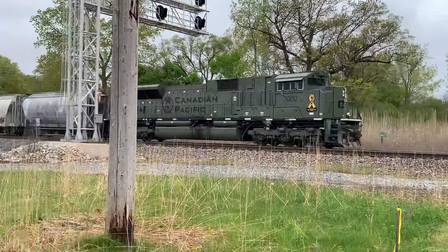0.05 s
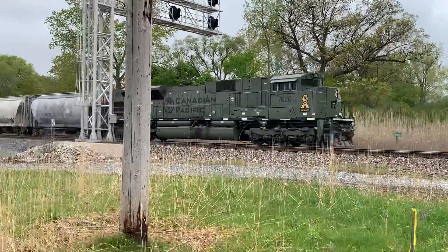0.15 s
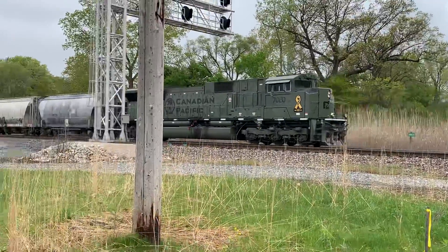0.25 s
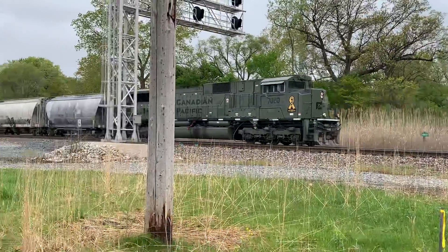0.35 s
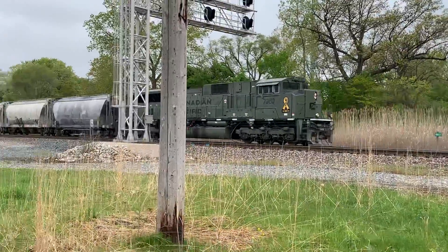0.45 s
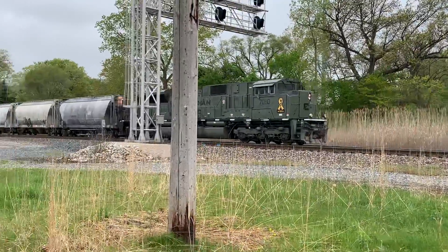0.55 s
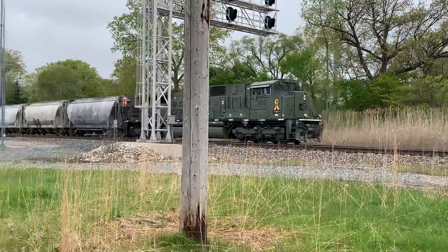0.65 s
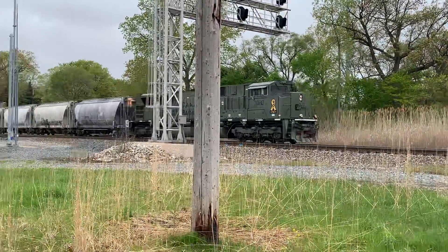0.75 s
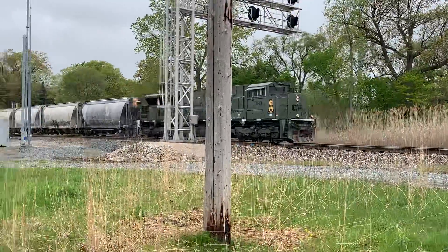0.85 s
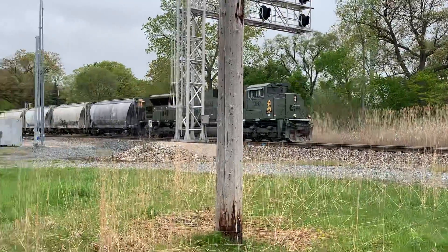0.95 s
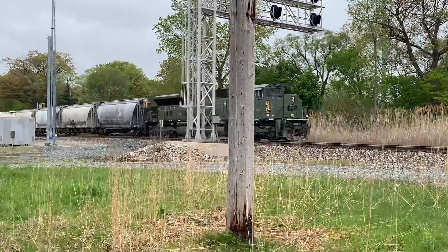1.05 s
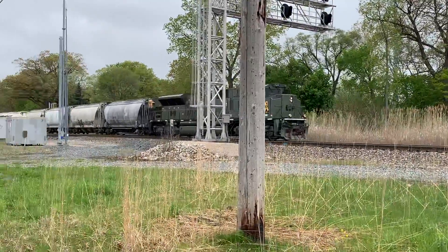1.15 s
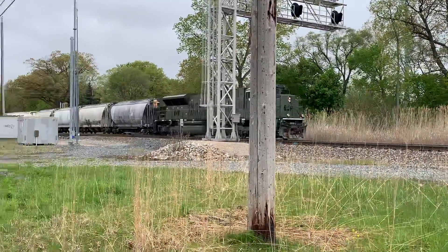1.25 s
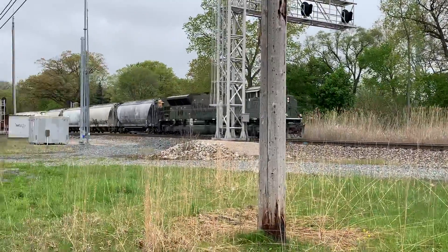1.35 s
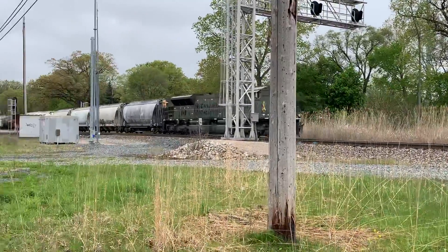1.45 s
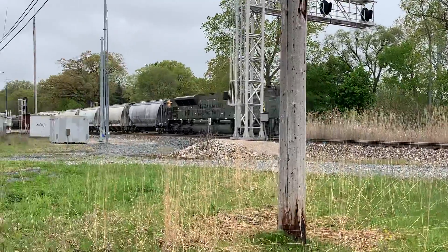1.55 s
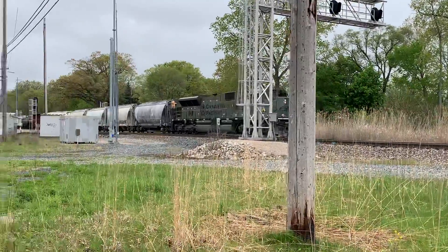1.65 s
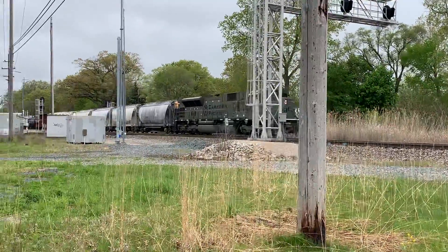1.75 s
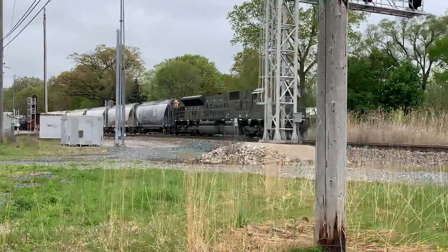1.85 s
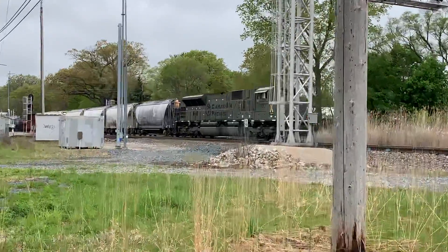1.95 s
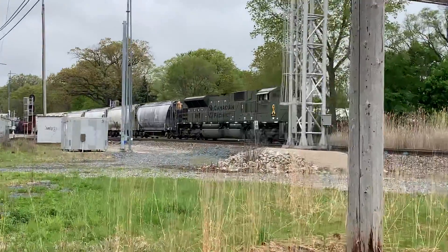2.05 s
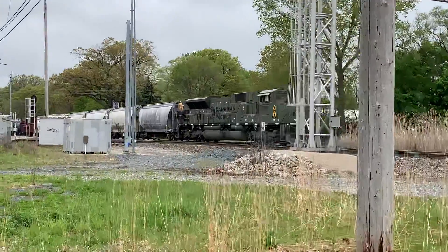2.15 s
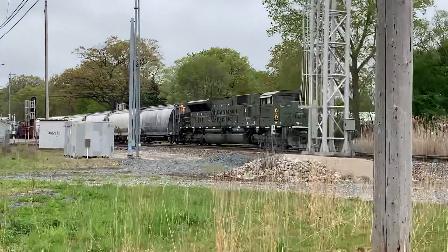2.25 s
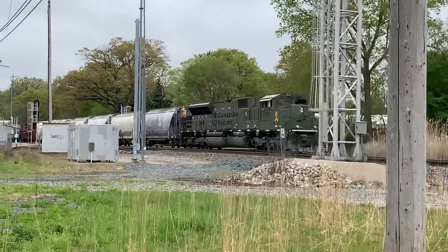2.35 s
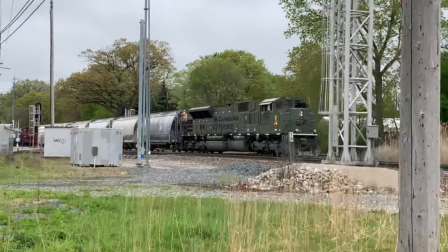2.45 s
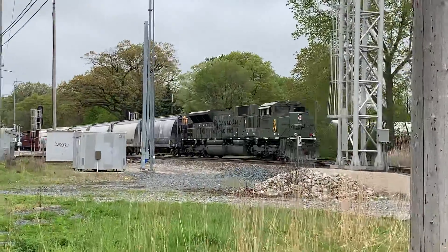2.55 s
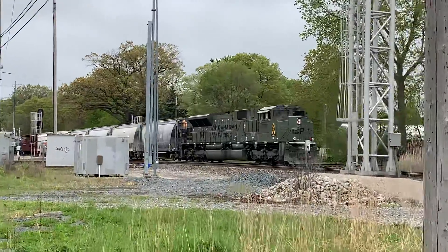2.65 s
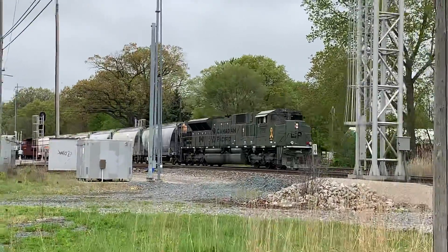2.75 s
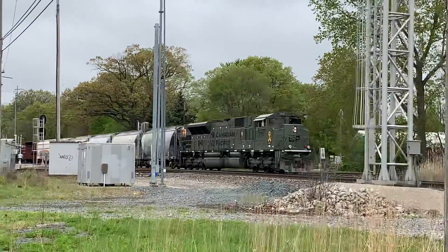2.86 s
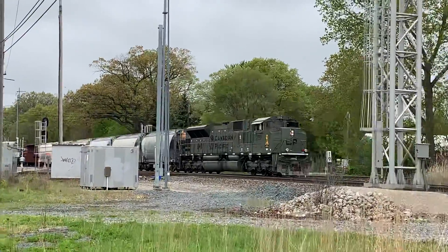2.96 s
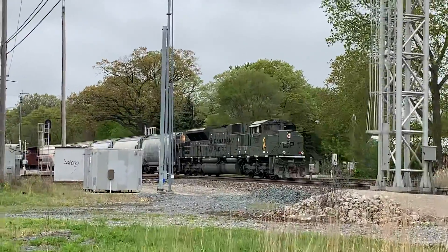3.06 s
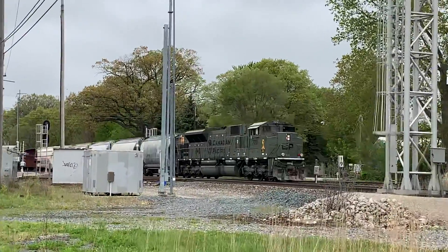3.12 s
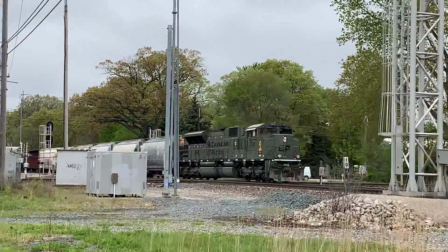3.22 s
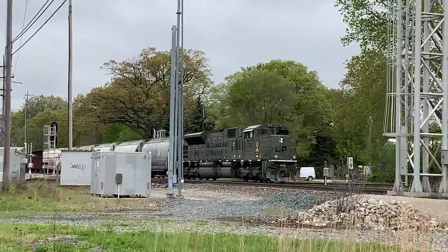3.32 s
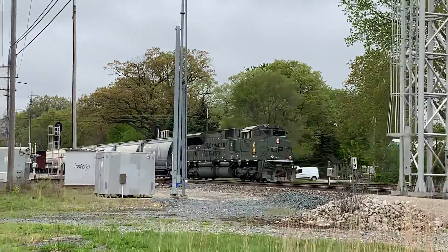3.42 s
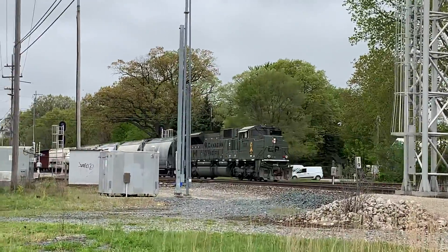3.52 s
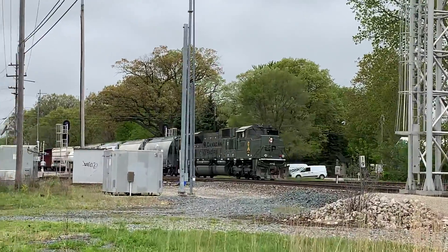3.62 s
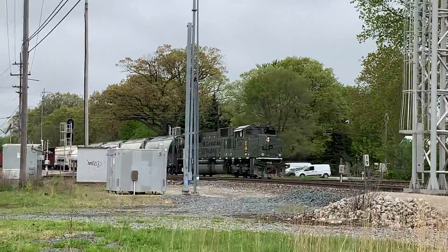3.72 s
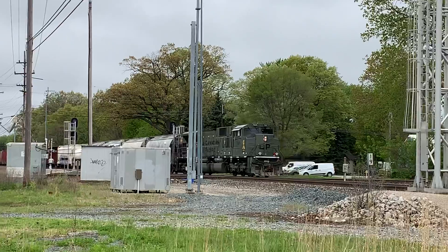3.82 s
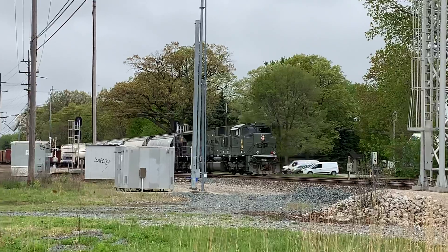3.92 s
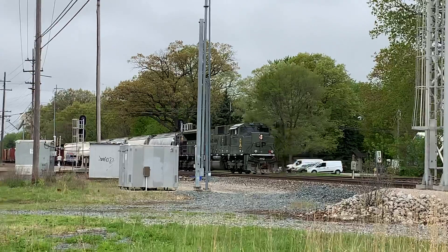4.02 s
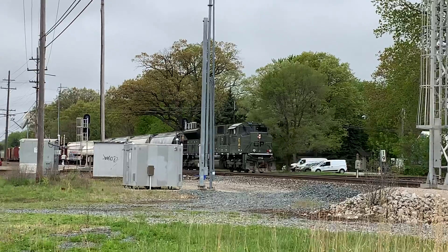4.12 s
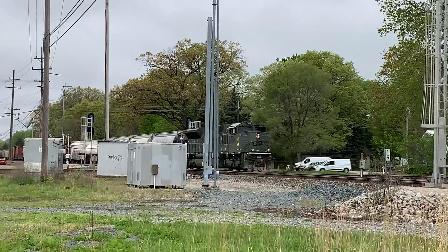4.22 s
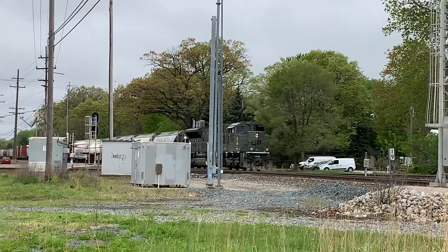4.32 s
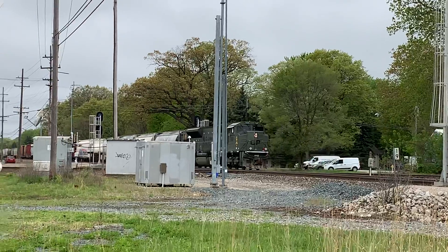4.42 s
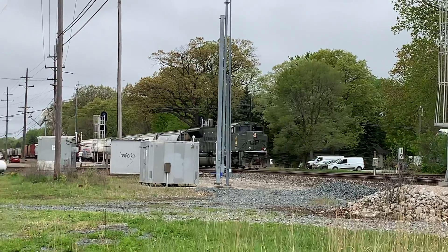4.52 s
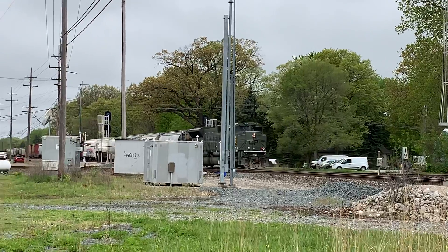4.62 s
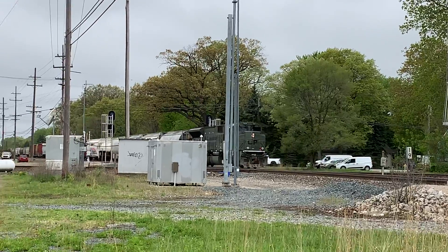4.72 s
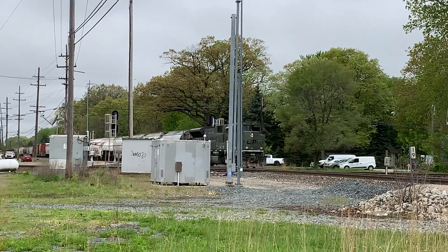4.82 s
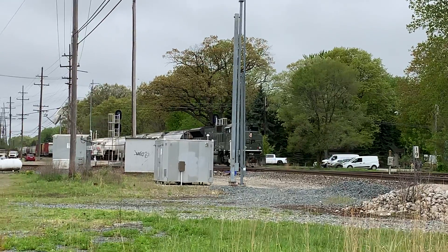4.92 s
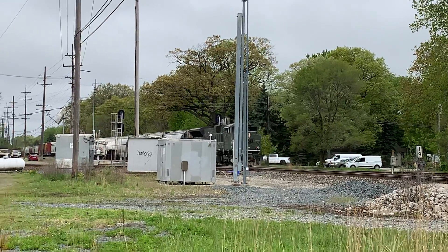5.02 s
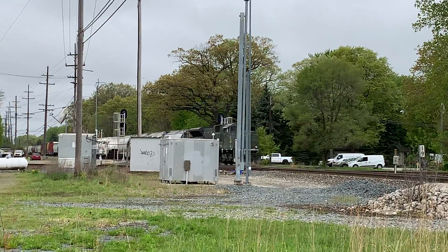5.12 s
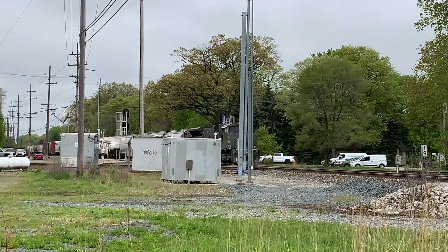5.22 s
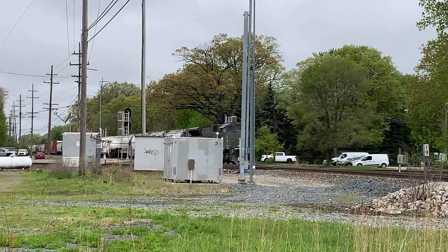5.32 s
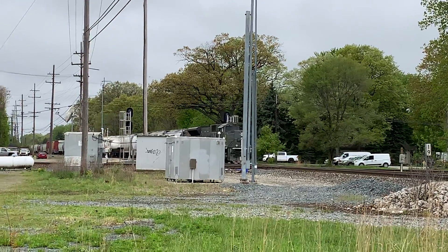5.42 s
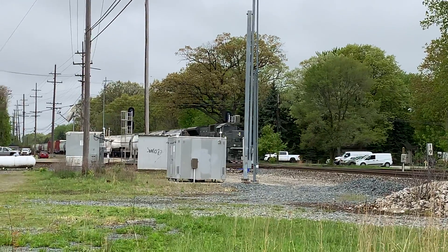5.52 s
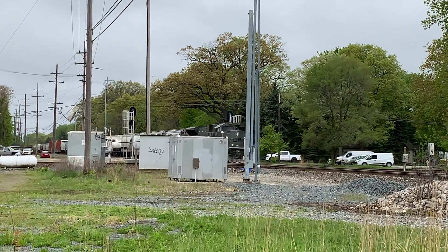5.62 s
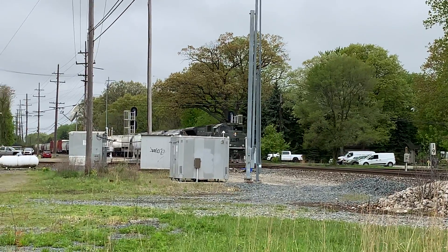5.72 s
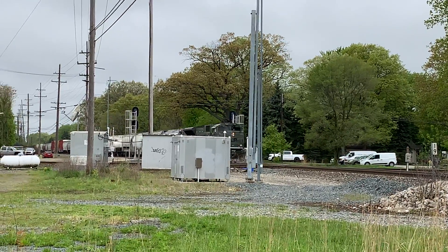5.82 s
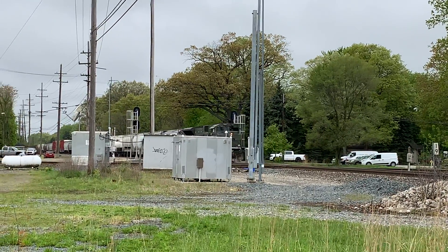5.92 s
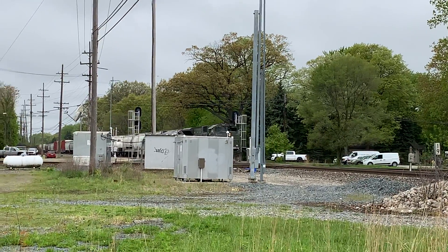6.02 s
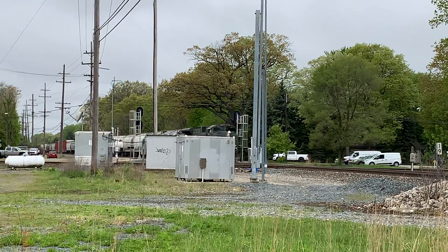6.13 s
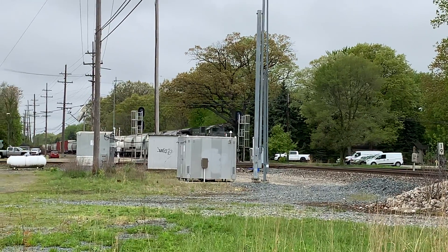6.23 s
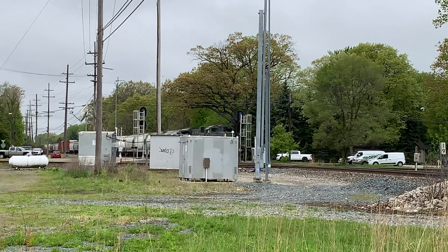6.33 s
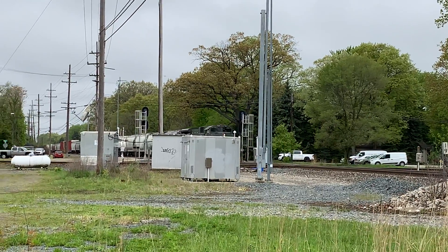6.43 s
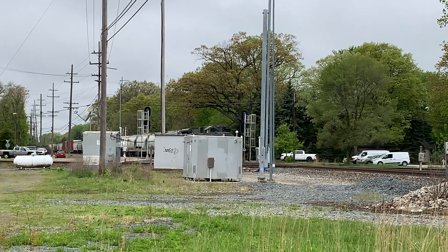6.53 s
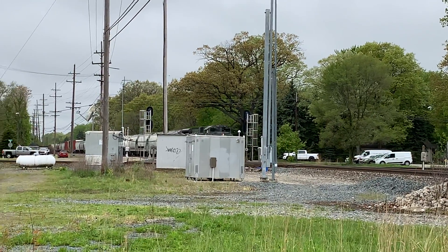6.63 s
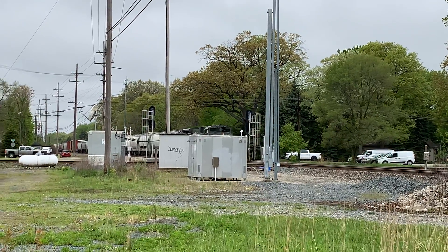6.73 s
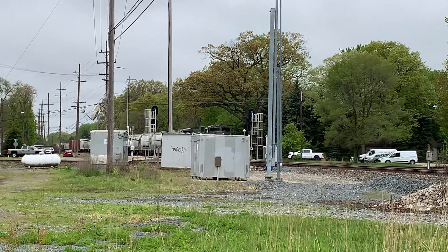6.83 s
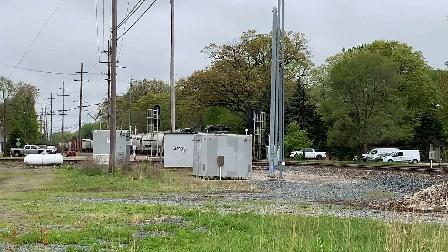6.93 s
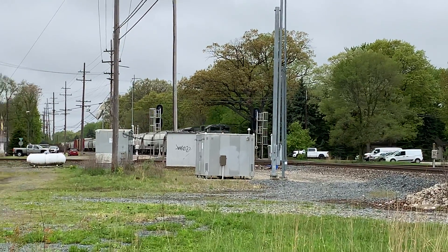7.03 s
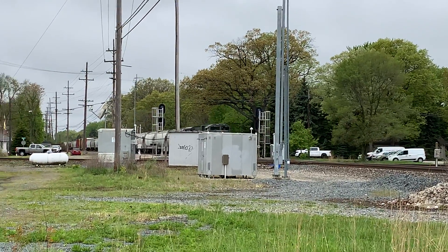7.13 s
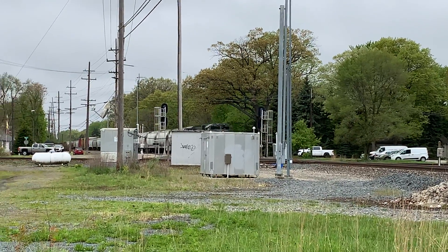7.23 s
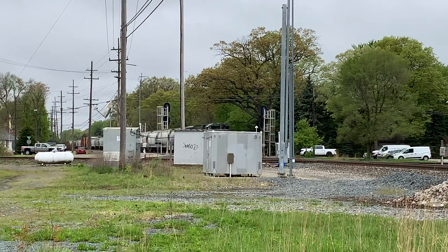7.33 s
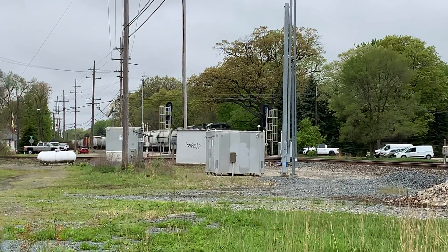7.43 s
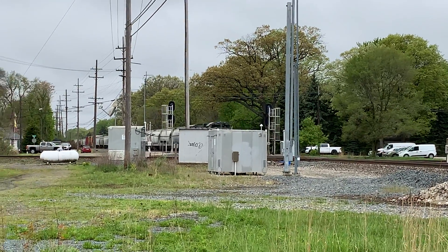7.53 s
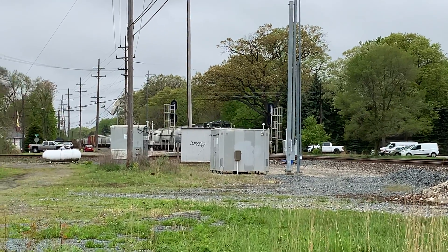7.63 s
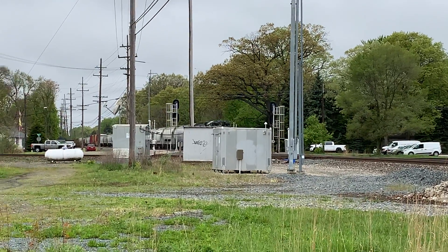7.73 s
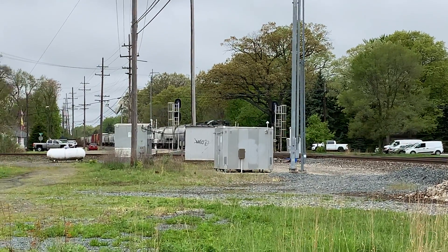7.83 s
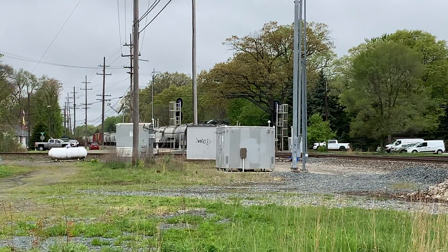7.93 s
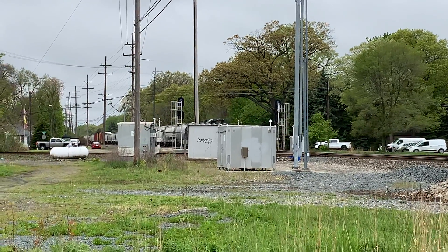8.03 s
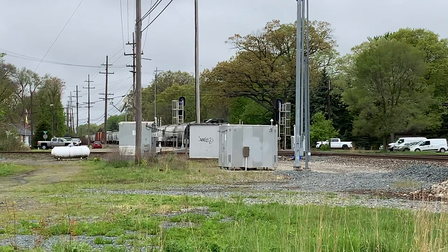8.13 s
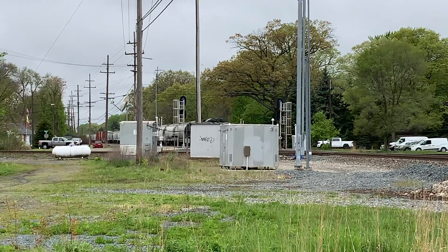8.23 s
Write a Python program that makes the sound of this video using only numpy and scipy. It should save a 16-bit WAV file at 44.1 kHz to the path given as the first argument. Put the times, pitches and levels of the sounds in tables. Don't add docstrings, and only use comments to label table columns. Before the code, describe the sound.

A trackside stereo pickup outdoors catches a diesel locomotive at the rear of a freight train moving away. From 0 s a low, throbbing exhaust drone beats slowly, with engine-room hum, fan and gear whine, and broad wheel roar and hiss. Paired axles bang over crossed rails around 0.2, 0.5, 1.2, 1.5 and 2.2 s, then heavier groups of three at 2.5 and 3.6 s, each a thud, metallic clank and loose-steel sizzle. Thin high flange squeals sound from 0.25 to 0.95 s, with a fainter one from 1.35 to 1.85 s. After 4 s the banging ends; engine and rolling noise sink, pitch having eased slightly down, and fan whine swells and dips past sheds. Faint distant joint knocks come between 4.8 and 5.7 s, then at 6.7 and 7.1 s. Tiny bird chirps appear around 6.4-6.8 s and a downward one at 8.1 s, over the remaining soft drone.

```python
import sys
import numpy as np
from scipy import signal
from scipy.fft import rfft, irfft, next_fast_len
from scipy.io import wavfile
from scipy.ndimage import uniform_filter1d, minimum_filter1d, map_coordinates

SR = 44100
rng = np.random.default_rng(int(sys.argv[2]) if len(sys.argv) > 2 else 0)


def dump(signal):
    limited = np.clip(np.atleast_2d(signal).T, -1, 1)
    pcm = np.round(limited * 32767).astype(np.int16)
    wavfile.write(sys.argv[1], SR, pcm)


def level_to_linear(level):
    exponent = np.asarray(level, float) / 20
    return 10 ** exponent


N = 364707
SIZE = next_fast_len(N, True)
HZ = np.fft.rfftfreq(SIZE, 1 / SR)


def rms_one(x):
    return x / np.sqrt(np.mean(x ** 2) + 1e-20)


def in_time(rows):
    times_s, *columns = np.transpose(rows)
    return [np.interp(np.arange(N) / SR, times_s, column) for column in columns]


def over_hz(rows, column=1):
    rows = np.array(rows)
    return np.interp(np.log(HZ + 1), np.log(rows[:, 0]), rows[:, column])


def drift(rate_hz):
    r = np.exp(-80 * np.pi * rate_hz / SR)
    white = rng.standard_normal(N // 40 + 2002)
    slow = signal.lfilter([1], [1, -2 * r, r * r], white)[2000:]
    return np.interp(np.arange(N) / 40, np.arange(len(slow)), rms_one(slow - slow.mean()))


def shape(spectrum):
    return level_to_linear(over_hz(spectrum)) * (HZ > spectrum[0][0]) * (HZ < spectrum[-1][0])


def noise(gain, flicker_db=0.0, patchy_db=0.0):
    rows = irfft(rfft(rng.standard_normal((2, SIZE))) * gain, SIZE)[:, :N]
    cells = signal.stft(rows, nperseg=1024)[2]
    patch = np.outer(np.hanning(5), np.hanning(14))
    patches = signal.fftconvolve(rng.standard_normal(cells.shape[1:]), patch, "same")
    rows = signal.istft(cells * level_to_linear(patchy_db * rms_one(patches)), nperseg=1024)[1][:, :N]
    return rms_one(rows * level_to_linear(flicker_db * drift(13)))


def tone(turns, level_db, waver_db, wander_rad, free=1):
    level = np.sqrt(2) * level_to_linear(level_db + waver_db * drift(2.5))
    phase = 2 * np.pi * (turns + free * rng.random())
    return level * np.sin(phase + wander_rad * drift(3))


# time_s, firing_order_db (16th), upper_neighbour_db (18th)
STRONG_ORDERS = [(0.0, -18, -27), (0.44, -15.5, -19), (0.99, -20, -18.5), (2.42, -23, -23.5),
                 (2.75, -34, -21.5), (2.99, -30, -24), (3.25, -27.5, -27), (3.8, -27, -23.5),
                 (4.26, -31.5, -25), (4.86, -22.5, -25.5), (5.13, -32, -23), (5.5, -31, -34.5),
                 (6.42, -29.5, -25), (6.91, -26.5, -27.5), (7.21, -30, -34), (7.71, -32.5, -26.5),
                 (8.27, -25, -44)]
# multiple_of_cycle_rate, level_db
ORDER_LEVELS = [(5, -25), (6, -19), (7, -14), (8, -11.5), (9, -3), (10, -3), (11, -15), (12, -3.5),
                (13, -8), (14, -18), (15, -1), (16, 0), (17, -27), (18, 0), (19, -24), (20, -0.5),
                (21, -14), (22, -24), (23, -34), (24, -7.5), (25, -31.5), (26, -13.5), (27, -14),
                (28, -20.5), (29, -15), (30, -15), (31, -25), (32, -21.5), (33, -32), (34, -21.5)]
# time_s, engine_cycle_hz, fan_blade_hz, gear_mesh_hz
PITCH = [(0, 7.72, 261.7, 322), (1.05, 7.667, 260.6, 320), (1.7, 7.645, 260.1, 319.2),
         (3.5, 7.625, 259.55, 318.1), (4.6, 7.617, 259.45, 318.1), (6, 7.607, 259.7, 318.4),
         (8.27, 7.606, 259.7, 318.6)]
# pitch_hz, density_db_per_hz
HOOD = [(22, -50), (35, -34), (50, -12), (65, 0), (90, -2), (110, -10), (145, -11), (180, -9), (230, -25)]
PULSE_SPREAD, PULSE_LAG = -1 / 24, 0.1331
BODY_DB, BODY_SHARE = -28, 0.51


def exhaust():
    firing_db, upper_db = uniform_filter1d(in_time(STRONG_ORDERS), size=SR // 4, mode="nearest")
    turns = np.cumsum(in_time(PITCH)[0]) / SR
    body_db = uniform_filter1d(np.maximum(firing_db, upper_db), size=SR, mode="nearest")
    body_db = BODY_DB + BODY_SHARE * (body_db - BODY_DB)
    levels_db = {round(order): body_db + db - 5.5 for order, db in ORDER_LEVELS}
    levels_db.update({16: firing_db, 18: upper_db})
    orders = np.zeros(N)
    for order, db in levels_db.items():
        order_turns = order * (turns + PULSE_LAG + PULSE_SPREAD * order)
        waver_db = .4 if order in (16, 18) else 2.0
        orders += tone(order_turns, db, waver_db, wander_rad=.12, free=0)
    return orders, level_to_linear(body_db - 5.5) * noise(shape(HOOD), flicker_db=0.7)


# time_s, loss_db, extra_treble_loss_db
PATH = [(0.0, -1, -4), (0.6, -2, 2.5), (1.0, -4.5, 1), (1.7, -3, -6), (2.1, -2.5, 3), (2.9, -4.5, -4),
        (3.4, -6, -3.5), (4.2, -7.5, -4), (4.5, -8, 0.5), (5.05, -7.5, -2), (5.25, -12, -6),
        (5.75, -11.5, -2), (6.05, -13, -4.5), (6.6, -11.5, -2.5), (7.15, -13, -1), (7.35, -16.5, -2.5),
        (8.0, -13.5, -2), (8.27, -13, -3)]
# multiple, in_line_db, share_of_path_loss, in_line_from_s, off_line_db
FAN_BEAMS = [(2, -28, 1.45, -1.0, -6), (3, -30, 1.28, 2.1, -18.5), (4, -28.5, 1.24, 3.5, -10)]
# centre_s, half_width_s, level_db
FAN_SHADE = [
    (4.62, 0.42, 3.5),
    (5.5, 0.33, 2),
    (6.08, .27, -7),
    (6.68, 0.07, 5),
    (7.08, 0.094, 6.5),
    (7.53, 0.26, -3),
]
SHADE_SHARES = (.5, .9, 1.1)
# multiple_of_mesh_rate, start_db, fade_db_per_s
GEARS = [(1, -38.5, 1.1), (1.86, -38, 5.0), (2, -40, 3.0), (2.11, -39, 6.0), (3, -38, 5.0)]
SWING_S = 0.18


def machinery():
    blade_turns, mesh_turns = np.cumsum(in_time(PITCH)[1:], axis=1) / SR
    t, loss_db = np.arange(N) / SR, in_time(PATH)[0]
    shade_db = sum(db * np.exp(-((t - s) / width) ** 4) for s, width, db in FAN_SHADE)
    out = np.zeros(N)
    for (multiple, db, share, since_s, off_db), shaded in zip(FAN_BEAMS, SHADE_SHARES):
        beam_db = off_db / (1 + np.exp((t - since_s) / SWING_S))
        level_db = db + share * loss_db + shaded * shade_db + beam_db
        out += tone(round(multiple) * blade_turns, level_db, waver_db=1.5, wander_rad=0.48)
    for multiple, db, fade in GEARS:
        out += tone(multiple * mesh_turns, db - fade * t, waver_db=2.5, wander_rad=1.0)
    return out


# pitch_hz, density_db_per_hz
RUMBLE = [(130, -25), (160, -3), (220, 0), (275, -4), (310, -12), (380, -19), (480, -31)]
ROAR = [(330, -19), (500, 1), (640, 7.5), (860, -2.5), (1050, 6), (1550, -2), (2100, -5.5), (2500, -9)]
HISS = [(2100, -32.5), (2600, -1), (3500, -1), (5200, -3), (6500, -4.5), (8000, -7.5), (9500, -10.5)]
AIR = [(7800, -34), (9000, 2), (11000, -0.5), (12600, -2.5), (13600, -0.5), (14200, 11), (14900, 3),
       (15300, -40)]
# start_db, share_of_path_loss, share_of_treble_loss, shake_db, shake_fade_db_per_s
RUMBLE_RULE = (-35.5, 0.04, -0.5, -8, 0.5)
ROAR_RULE = (-23, 1.11, 0.0, -25, -2)
HISS_RULE = (-29, .8, 0.66, -15.5, 2.6)
AIR_RULE = (-29, 1.9, 0.1, -28.5, 5)


def rolling():
    (loss_db, dull_db), t = in_time(PATH), np.arange(N) / SR
    shake = swell(column=2, rise_s=.03, fall_s=.1, tail_s=.2, tail_db=-15)

    def level(rule):
        db, share, treble, shake_db, fade = rule
        steady = level_to_linear(db + share * loss_db + treble * dull_db)
        return np.hypot(steady, level_to_linear(shake_db - fade * t) * shake)

    rumble = level(RUMBLE_RULE) * noise(shape(RUMBLE), flicker_db=1.5)
    roar = level(ROAR_RULE) * noise(shape(ROAR), flicker_db=0.06, patchy_db=2.0)
    hiss = level(HISS_RULE) * noise(shape(HISS), flicker_db=1.2, patchy_db=2.3)
    air = level(AIR_RULE) * noise(shape(AIR), flicker_db=2.0, patchy_db=1.5)
    return rumble + roar + hiss + air


# first_axle_s, axles, axle_gap_s
BOGIES = [
    (0.19, 2, .135),
    (0.509, 2, .116),
    (1.17, 2, .132),
    (1.486, 2, .108),
    (2.168, 2, .116),
    (2.532, 3, .144),
    (3.61, 3, .148),
]
# clank_db, thud_db, sizzle_db
BOGIE_DB = [(-16, -18, -29), (-14, -15, -25.5), (-13, -15, -31), (-12.5, -16, -29.5), (-12.5, -17.5, -34.5),
            (-14.5, -15, -34), (-15, -12.5, -31)]
# clank_db, thud_db, sizzle_db
SECOND_RAIL_DB = (-1.5, -6.5, 0.9)
# start_s, clank_db
FAR_JOINTS = [
    (4.78, -41),
    (5.12, -33),
    (5.496, -31),
    (5.69, -28.5),
    (6.7, -37),
    (7.1, -28),
]
RAIL_GAP_S = .118
LEAD_WHEEL_DB = -3
FAR_THUD_DB, FAR_SIZZLE_DB = 0, -17.5


def blows():
    rows = [(s, db, db + FAR_THUD_DB, db + FAR_SIZZLE_DB) for s, db in FAR_JOINTS]
    for (start_s, axles, gap_s), bogie_db in zip(BOGIES, BOGIE_DB):
        for axle in range(axles):
            for rail in range(2):
                lead_db = LEAD_WHEEL_DB * (axle + rail == 0)
                levels_db = bogie_db + rail * np.array(SECOND_RAIL_DB) + lead_db
                rows.append((start_s + axle * gap_s + rail * RAIL_GAP_S, *levels_db))
    return np.array(rows)


def swell(column, rise_s, fall_s, tail_s, tail_db):
    rows, t, marks = blows(), np.arange(SR // 2) / SR, np.zeros(N)
    np.add.at(marks, (rows[:, 0] * SR).astype(int), level_to_linear(2 * rows[:, column]))
    fall = np.exp(-2 * t / fall_s) + level_to_linear(2 * tail_db) * np.exp(-2 * t / tail_s)
    power = (1 - np.exp(-t / rise_s)) ** 2 * fall
    return np.sqrt(np.abs(signal.fftconvolve(marks, power / power.max())[:N]))


# pitch_hz, width_hz, level_db
THUD_MODES = [(63.3, 3.8, 8.5), (105, 84, 1.5), (175.5, 29, 2.5), (210, 18, 3), (280, 46, -17),
              (372, 200, -13.5)]
# pitch_hz, density_db_per_hz
CLANK = [(320, -2.5), (600, 0.5), (850, -7.5), (1050, 3), (1550, 2), (2100, 2), (2500, -30)]
# pitch_hz, density_db_per_hz
SIZZLE = [(2100, -6), (2800, 6.5), (3500, 2.5), (5300, -2), (6500, -3), (9000, -3), (12500, -15.5),
          (13700, -19), (14500, -28)]


def crossing():
    modes = sum(level_to_linear(db) / (1 + 1j * (HZ - hz) / (width / 2)) ** 2 for hz, width, db in THUD_MODES)
    low_cut = 1 / (1 + (52 / (HZ + 1)) ** 8)
    thud_level = swell(column=2, rise_s=0.0059, fall_s=0.014, tail_s=0.089, tail_db=-12)
    clank_level = swell(column=1, rise_s=.018, fall_s=.02, tail_s=.1, tail_db=-9)
    sizzle_level = swell(column=3, rise_s=.02, fall_s=.02, tail_s=.1, tail_db=-9)
    thud = level_to_linear(0.5) * thud_level * noise(np.abs(modes) * low_cut)
    clank = level_to_linear(-9.0) * clank_level * noise(shape(CLANK), patchy_db=3.5)
    sizzle = level_to_linear(2.0) * sizzle_level * noise(shape(SIZZLE), patchy_db=4.0)
    return thud + clank + sizzle


# start_s, length_s, start_hz, end_hz, level_db
CHIRPS = [
    (.25, 0.65, 4370, 4325, -36),
    (0.504, 0.44, 4885, 4860, -39),
    (1.35, 0.49, 5700, 5680, -47),
    (6.362, .04, 4630, 4800, -39),
    (6.59, .07, 5100, 5030, -46),
    (6.733, 0.078, 5090, 5160, -42),
    (8.1, 0.17, 4500, 4360, -41.5),
]


def whistles():
    out = np.zeros(N)
    for start_s, length_s, from_hz, to_hz, db in CHIRPS:
        at = int(start_s * SR)
        count = min(int(length_s * SR), N - at)
        phase = 2 * np.pi * np.cumsum(np.linspace(from_hz, to_hz, count)) / SR
        out[at:at + count] += level_to_linear(db) * signal.windows.tukey(count, .5) * np.sin(phase)
    return out


def scene():
    orders, hood = exhaust()
    tones = orders + machinery() + whistles()
    tone_pair = np.array([tones, np.roll(tones, 900)])
    return hood + rolling() + crossing() + tone_pair


def limit(pair, top):
    room = np.minimum(1, top / (np.abs(pair).max(axis=0) + 1e-9))
    return pair * uniform_filter1d(minimum_filter1d(room, size=801), size=801)


def low_pass(x):
    return signal.sosfilt(signal.butter(12, 16400, fs=SR, output="sos"), x)


# pitch_hz, likeness (0-1), right_lead_rad, left_minus_right_db
STEREO = [(30, .93, 0, -.4), (60, .98, 0, 0), (130, .999, 0, 0), (250, .97, 0, 0), (600, .95, 0, .3),
          (1200, .88, -.1, 1.5), (2000, .85, -.3, 1), (2800, .8, -1, -3), (5000, .75, -1.6, -4),
          (5600, .4, -1.2, -4), (6000, .8, 0, -1), (7000, .85, 1.0, -.3), (8200, .99, 3.0, 0),
          (9000, .99, 3.3, 0), (9700, .95, 4.3, 0), (10500, .995, 6.2, 0), (11600, .995, 6.4, 0),
          (12500, .99, 9.0, 0), (13200, .999, 9.42, 0), (13700, .999, 9.42, 0), (14400, .97, 10.0, 0)]
# time_s, extra_right_lag_samples
TURN = [(0, 9.5), (.5, 5), (1.2, 3), (2.2, 1), (3, -0.5), (8.27, 1.5)]
# delay_ms, strength (0-1)
ECHO_MS = ((1.62, .6), (1.65, 1))
# pitch_hz, echo_share (0-1)
ECHO = [(700, 0.1), (1200, 0.95), (1850, 0.9), (2250, 0.41), (2600, 0), (4000, 0), (7000, 0.13)]


def record(dry):
    direct, scattered = rfft(dry, SIZE)
    alike = np.clip(over_hz(STEREO), 0, 1)
    lead_rad = np.interp(HZ, *np.array(STEREO)[:, [0, 2]].T)
    tilt = level_to_linear(over_hz(STEREO, column=3) / 2)
    share = np.clip(over_hz(ECHO), 0, .95)
    echo = []
    for delay_ms, strength in ECHO_MS:
        depth = strength * share
        comb = 1 - depth * np.exp(-2j * np.pi * HZ * delay_ms / 1000)
        echo.append(comb / np.sqrt(1 + depth ** 2))
    left = irfft(direct * tilt * echo[0], SIZE)[:N]
    right = alike * np.exp(1j * lead_rad) * direct + np.sqrt(1 - alike ** 2) * scattered
    right = right / tilt * echo[1]
    lows = 1 / (1 + np.minimum(HZ / 5700, 2) ** 150)
    heard_at = np.arange(N) - in_time(TURN)[0]
    late_lows = map_coordinates(irfft(right * lows, SIZE), [heard_at], order=3, mode="nearest")
    highs = irfft(right * (1 - lows), SIZE)[:N]
    mix = limit(np.array([left, late_lows + highs]), top=.9)
    return low_pass(mix)


dry = scene()
out = record(dry)
dump(out)
```